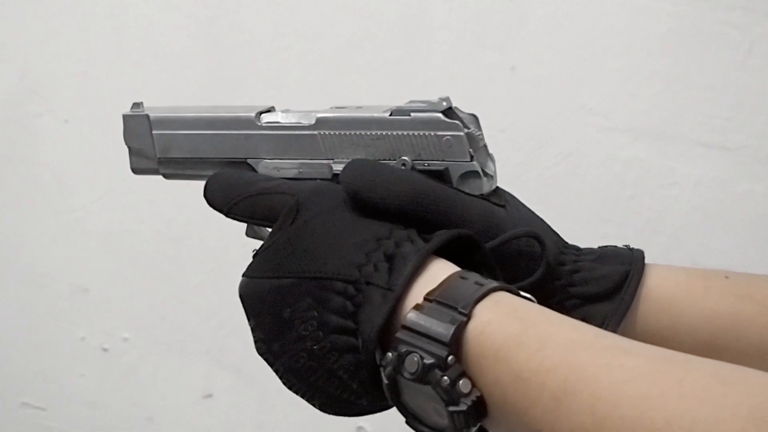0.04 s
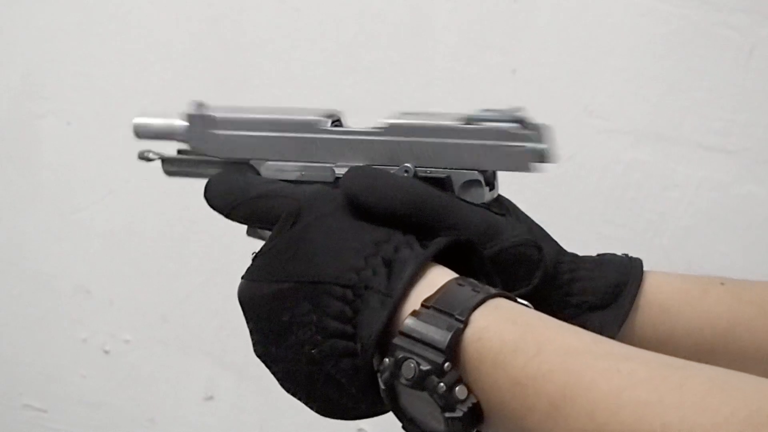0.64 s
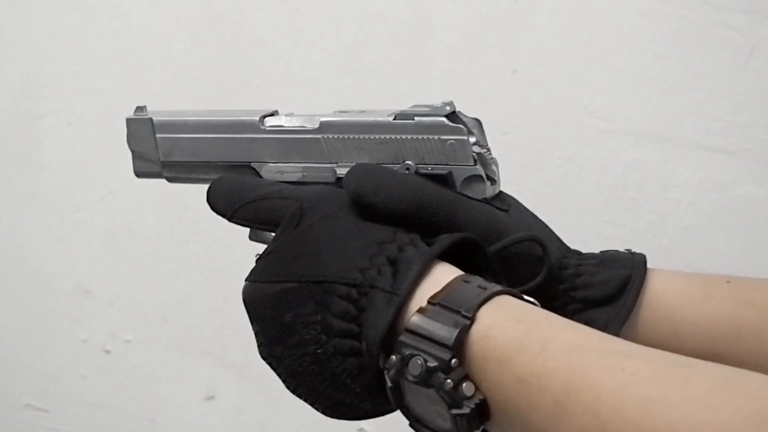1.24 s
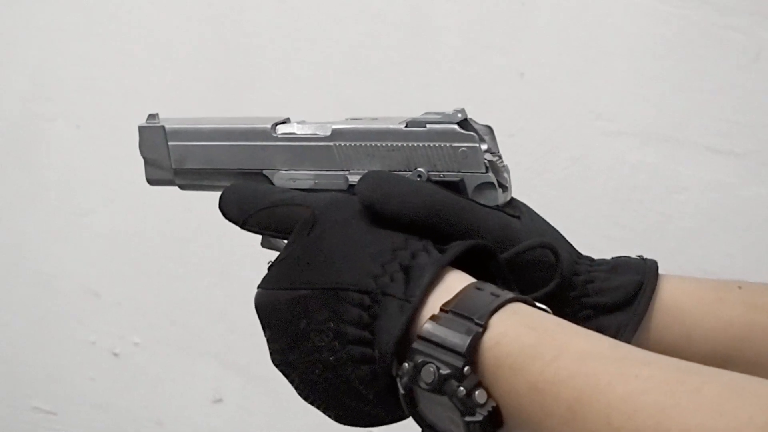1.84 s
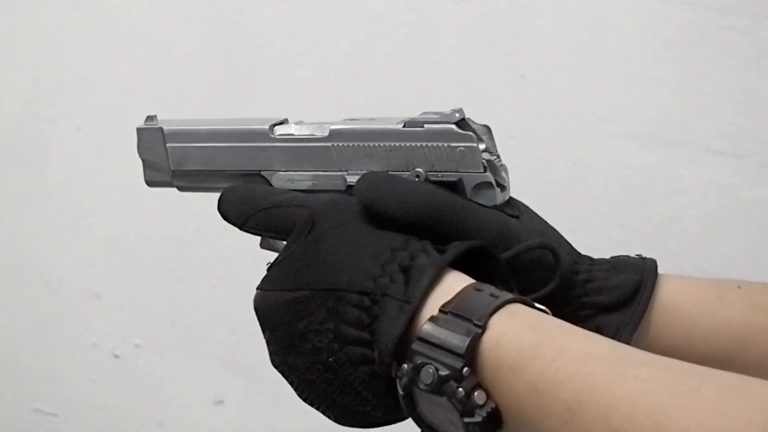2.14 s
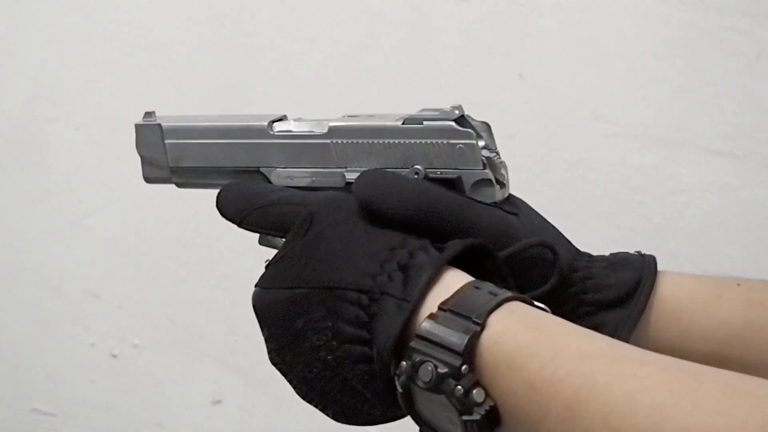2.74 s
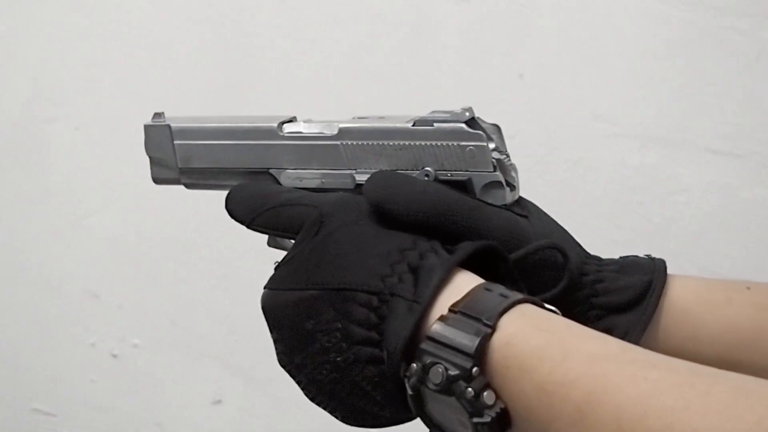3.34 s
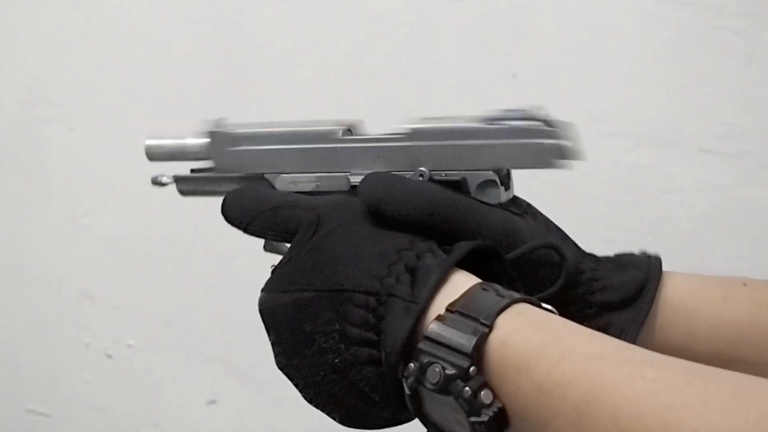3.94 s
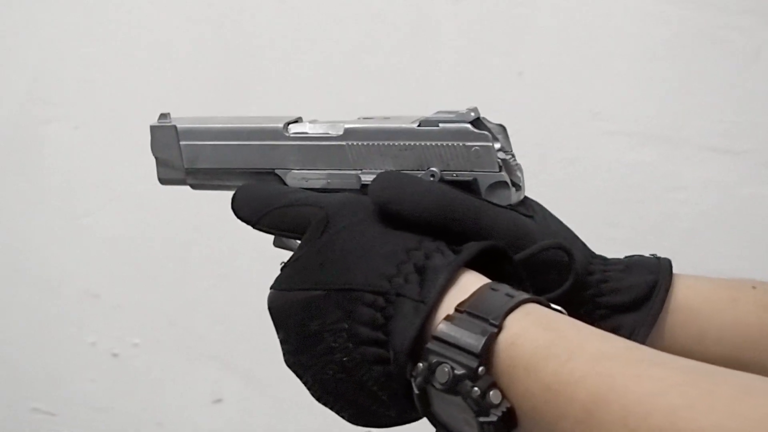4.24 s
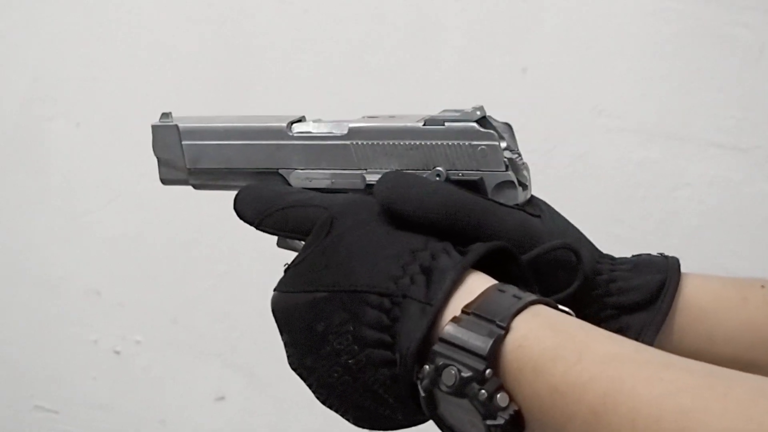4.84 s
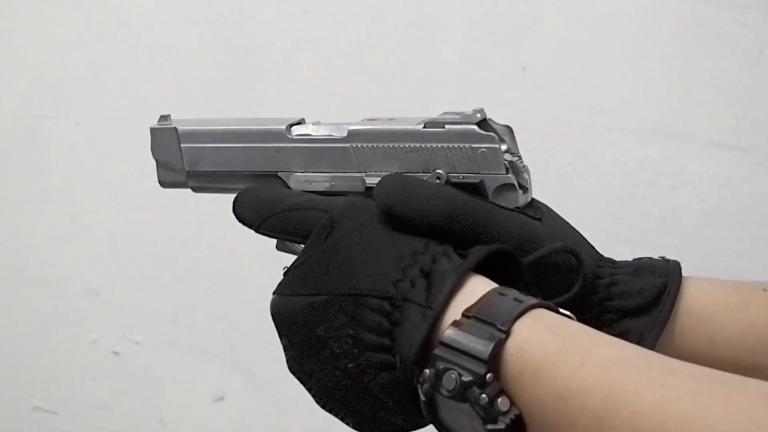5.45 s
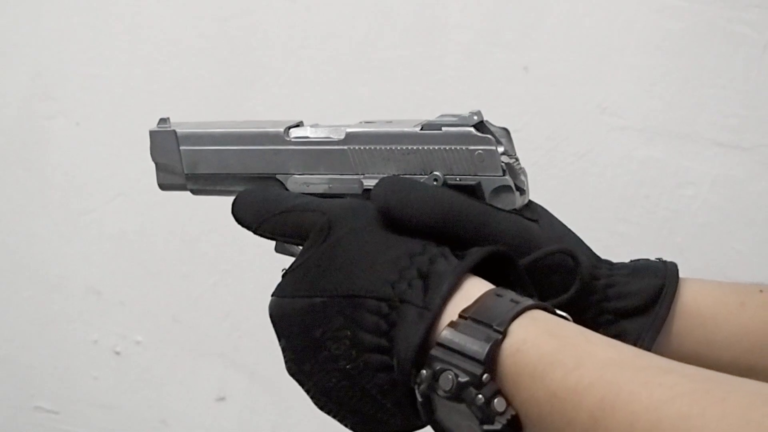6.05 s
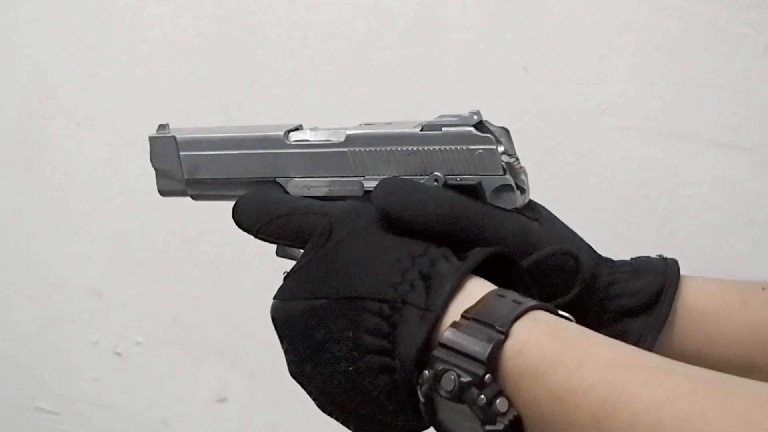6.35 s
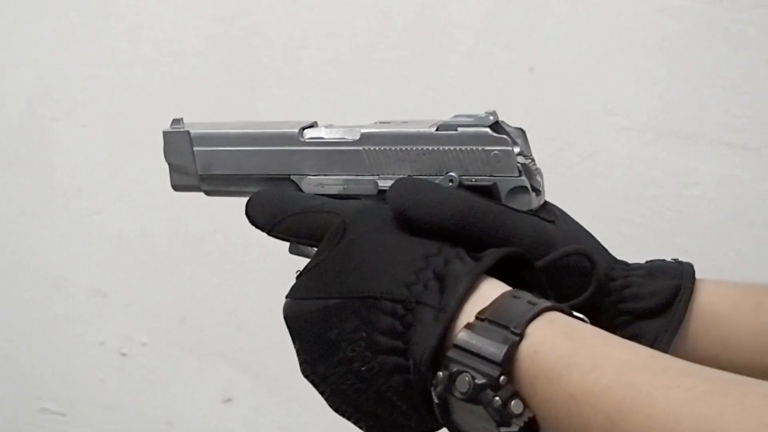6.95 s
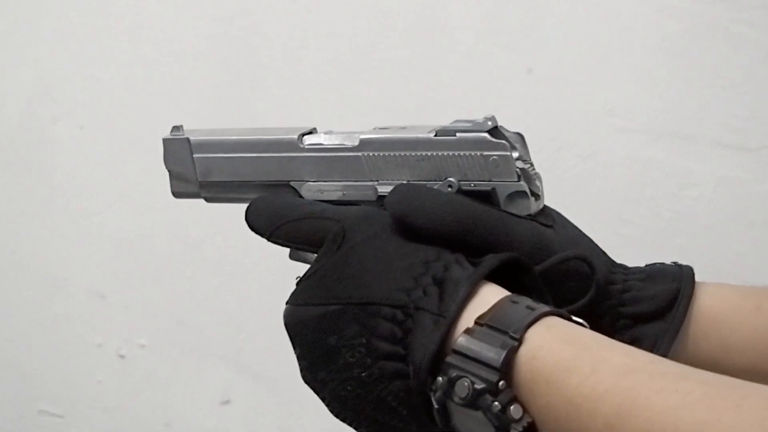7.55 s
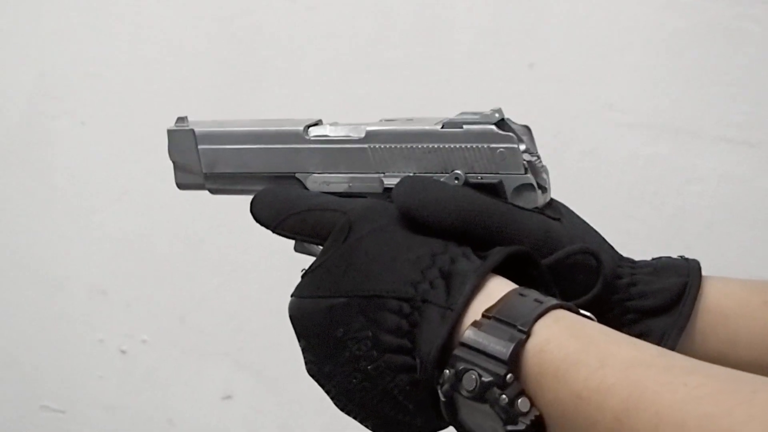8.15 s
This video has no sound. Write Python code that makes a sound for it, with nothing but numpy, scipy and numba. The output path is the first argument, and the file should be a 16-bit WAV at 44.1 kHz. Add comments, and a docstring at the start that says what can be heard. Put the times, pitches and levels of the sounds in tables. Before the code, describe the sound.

An airsoft pistol fires nine sharp shots with a clattering slide in a hard, echoing hall, over a faint ventilation hum.

```python
"""Airsoft pistol in an indoor range

A gas blowback pistol fires nine close shots in a hard, echoing hall: each is a hammer click, a gas
blast and the clatter of the slide, then the pellet's knock on the backstop. Strays ricochet and tick
on the floor far away. Gain control ducks each blast and lifts the long tail, over faint air and hum."""
import sys
import numpy as np
from scipy import signal
from scipy.fft import rfft, irfft, next_fast_len
from scipy.io import wavfile
from scipy.ndimage import uniform_filter1d
from numba import njit

SR = 44100
rng = np.random.default_rng(int(sys.argv[2]) if len(sys.argv) > 2 else 0)


def pcm_store(signal):
    """Save signal as 16-bit PCM."""
    levels = np.round(np.clip(np.atleast_2d(signal), -1, 1) * 32767)
    wavfile.write(sys.argv[1], SR, levels.astype(np.int16).T)


N = 361179

# the shots: (time [s], gas blast [dB], hammer [dB], slide [dB], backstop knock [dB])
SHOTS = [(0.6355, 21, -7, 6.5, 0), (2.0310, 25.5, -14.5, 1, 1), (2.5956, 22.5, -15, 9.5, -21),
         (3.9625, 22, -12, 6, -10), (4.506, 26.5, -8.5, 12.5, -9), (5.8770, 20.5, -13, 1, -3),
         (6.2905, 18, -10, 11.5, -10), (7.3490, 24, -11, 9.5, 4), (7.7600, 22, -14, 9.5, -24)]
# modes of grip, slide and barrel: (frequency [Hz], width [Hz], level [dB])
STEEL_MODES = [(473, 190, 8.5), (975, 110, 18.5), (1590, 250, 9.5), (2310, 210, 18.5), (3270, 1300, 12),
               (3900, 780, 12.5), (8100, 1150, 8), (10200, 780, -27)]
# tone of the microphone: (frequency [Hz], gain [dB])
MIC_EQ = [(40, -24), (120, -5.5), (600, -5.5), (1020, -3), (1330, -8), (1750, -2), (2120, -4.5),
          (3400, -0.5), (6600, -5), (8300, -4), (9800, -2.5), (11600, -7.5), (13000, -19.5), (16000, -22.5)]


def pistol(hammer_lead_s=0.0092, hiss_db=-13.5, hall_db=-12, boom_db=10, ring_db=8.5):
    """Hammer, blast and slide, in mid and side; the muzzle shifts, so each shot has its own echoes."""
    # the slide unlocks, hits its stop and springs home: (delay after the blast [s], level [dB])
    slide_hits = [(0.0075, -1.5), (0.018, 3), (0.069, -3)]
    # ring that the whole pistol sends into the hall: (frequency [Hz], width [Hz], level [dB])
    frame_modes = [(496, 41, 2), (1000, 29, 0.5), (1690, 195, 2), (2660, 160, -3.5), (3434, 55, -2),
                   (4290, 300, -3.5), (4625, 94, 5), (8230, 330, 5), (9590, 360, 3.5)]
    out = np.zeros((2, N))
    for s, blast_db, hammer_db, slide_db, _ in SHOTS:
        add(out, s - hammer_lead_s, undb(hammer_db) * hammer())
        add(out, s, undb(blast_db) * (gas_blast() + undb(hiss_db) * breech_hiss()))
        for delay, db in slide_hits:
            add(out, s + delay, undb(slide_db + db) * slide_clack())
        echoes = hall()
        add(out, s, undb(blast_db + hall_db) * echoes + undb(boom_db) * hall_boom())
        # mid and side swap: the metal's ring arrives by other paths than the blast
        add(out, s, undb(ring_db) * ring(echoes[::-1], frame_modes))
    return out


def gas_blast(hold_s=0.0022, t60=0.013, push_s=0.00035, push_db=1):
    """Gas leaves the muzzle: one push of air under a short turbulent crack."""
    # resonances of the blast: (frequency [Hz], width [Hz], level [dB])
    blast_modes = [(422, 210, 4.5), (1010, 130, 6), (1360, 1100, -3), (2550, 130, 6), (2980, 310, 2.5),
                   (4500, 920, -5.5), (8070, 240, 1.5), (11400, 1900, -10)]
    t = np.arange(SR // 10) / SR
    flow = fade(np.maximum(t - hold_s, 0), t60)
    crack = ring(rng.standard_normal((2, len(t))) * flow, blast_modes)
    push = undb(push_db) * (1 - 0.37 * t / push_s) * np.exp(-t / push_s)
    crack[0] -= push  # mid only
    return crack


def breech_hiss(open_s=0.025, low_hz=5200):
    """Gas hisses out of the breech while the slide runs back, until the valve shuts."""
    t = np.arange(SR // 10) / SR
    flow = np.minimum(t / open_s, 1) ** 0.96 * fade(np.maximum(t - open_s, 0), t60=0.0052)
    highpass = signal.butter(2, low_hz, "high", fs=SR, output="sos")
    return signal.sosfilt(highpass, rng.standard_normal((2, len(t))) * flow)


def slide_clack(modes_db=-2, crack_db=1):
    """Metal meets metal: a dry crack and the short ring of grip, slide and barrel."""
    contact = burst(t60=0.023)
    return undb(modes_db) * ring(contact, STEEL_MODES) + undb(crack_db) * contact


def hammer(modes_db=-6, noise_db=-2.5):
    """The hammer falls: a steely click with a short wash of noise."""
    return undb(modes_db) * ring(burst(t60=0.011), STEEL_MODES) + undb(noise_db) * burst(t60=0.57)


def pellets(flight_s=0.18, contact_t60=0.07, tick_top_hz=15300):
    """Plastic pellets knock on the backstop, ricochet and tick; returns direct sound and hall send."""
    # ricochets off panels and fittings: (time [s], level [dB], centre [Hz], width [octaves])
    ricochets = [(4.159, 6.5, 11000, 0.57), (4.547, 2, 3750, 0.8), (4.869, 1.5, 2550, 1.28),
                 (6.261, -4, 3300, 0.39)]
    # ticks on the hard floor: (time [s], level [dB], low edge [Hz])
    floor_ticks = [(1.732, -34, 6750), (3.142, -20.5, 8380), (3.336, -25, 5150), (3.620, -36, 3860),
                   (3.731, -34, 3900), (5.074, -15.5, 6370), (5.385, -17.5, 2960), (5.420, -11, 1900),
                   (6.814, -18, 5250), (7.060, -36.5, 5030)]
    knock_db, ricochet_db, tick_db = -10, 8, -17  # direct sound against the hall send
    hits = [(s + flight_s, db, knock_db, band(hz=2020, octaves=3.65)) for s, *_, db in SHOTS]
    hits += [(s, db, ricochet_db, band(hz, octaves)) for s, db, hz, octaves in ricochets]
    hits += [(s, db, tick_db, (low_hz, tick_top_hz)) for s, db, low_hz in floor_ticks]
    direct, send = np.zeros((2, N)), np.zeros(N)
    for s, db, direct_db, edges_hz in hits:
        bandpass = signal.butter(2, edges_hz, "band", fs=SR, output="sos")
        add(direct, s, undb(db + direct_db) * signal.sosfilt(bandpass, burst(contact_t60)))
        add(send, s, undb(db) * signal.sosfilt(bandpass, signal.unit_impulse(SR // 10)))
    return direct, send


def trigger(send_db=-9):
    """The trigger takes up its slack with small ringing clicks; returns direct sound and hall send."""
    # audible pulls: (time [s], level [dB])
    pulls = [(3.854, -29), (7.263, -32.5)]
    # clicks within one pull: (delay [s], level [dB])
    clicks = [(0, 3), (0.010, -10.5), (0.043, -25)]
    # modes of the linkage: (frequency [Hz], width [Hz], level [dB])
    linkage_modes = [(1640, 170, 11), (1900, 180, 11.5), (3380, 3300, 0), (9600, 720, 0)]
    direct, send = np.zeros((2, N)), np.zeros(N)
    for s, pull_db in pulls:
        for delay, db in clicks:
            add(direct, s + delay, undb(pull_db + db) * burst(t60=0.089))
            add(send, s + delay, undb([pull_db + db + send_db]))
    return ring(direct, linkage_modes), ring(send, linkage_modes)


def grip_tick(time_s=1.886, level_db=-31):
    """One faint, dull tick as the gloved hand tightens on the grip."""
    # modes of the grip: (frequency [Hz], width [Hz], level [dB])
    grip_modes = [(600, 250, 14), (2200, 600, 2)]
    out = np.zeros((2, N))
    add(out, time_s, undb(level_db) * ring(burst(t60=0.02), grip_modes))
    return out


def hall(late_share=0.21, build_s=0.67):
    """Mid and side response of the hall from one spot: dense echoes that lose their treble first."""
    # reverb time: (frequency [Hz], t60 [s])
    decay_times = [(150, 1.74), (400, 1.554), (1000, 1.467), (2000, 1.305), (4000, 1.124), (7000, 0.88),
                   (10500, 0.66), (16000, 0.46)]
    # tone of the reverb: (frequency [Hz], gain [dB])
    hall_eq = [(60, -15), (90, -8.5), (125, -1.5), (250, -1), (400, 1.5), (700, 1), (1500, -1), (4000, 1),
               (8000, 1), (15000, -2)]
    t = np.arange(2 * SR) / SR
    hz = np.fft.rfftfreq(len(t), 1 / SR)
    spectrum = rfft(rng.standard_normal((2, len(t)))) * undb(curve_at(hall_eq, hz))
    centres = np.transpose(decay_times)[0]
    echoes = np.zeros((2, len(t)))
    for centre, t60 in decay_times:
        band_weight = curve_at(np.c_[centres, centres == centre], hz)
        echoes += irfft(spectrum * band_weight) * fade(t, t60)
    # the echoes thicken as the sound comes back from the far walls
    return echoes * (1 - late_share * fade(t, build_s))


def hall_boom(t60=2.3, partner_db=-7, trim_db=-38):
    """A shot stirs standing waves in close pairs that beat and outlast the echoes."""
    # standing waves: (frequency [Hz], width [Hz], level [dB])
    room_modes = [(117.1, 4, 12.5), (140, 3.3, 0), (172.95, 5.2, 14), (343.5, 5.4, 2.5)]
    t = np.arange(2 * SR) / SR
    out = np.zeros((2, len(t)))
    for hz, width, db in room_modes:
        partner_hz = hz + width * rng.uniform(-1.566, 1.527)
        main, partner = np.sin(2 * np.pi * (np.outer([hz, partner_hz], t) + rng.random((2, 1))))
        swell = 1 - np.exp(-np.pi * width * t)
        out[0] += undb(db + trim_db) * (main + undb(partner_db) * partner) * swell
    return out * fade(t, t60)


def ventilation(air_db=-46.5, spread_db=-5):
    """Steady moving air, partly unrelated left and right, and a faint motor hum."""
    # spectrum of the air: (frequency [Hz], relative level [dB])
    air_eq = [(25, -35), (45, 14.5), (70, 4.5), (150, -1.5), (300, -6), (800, -13.5), (1750, -22),
              (3400, -28.5), (5300, -32), (10000, -36), (16000, -52)]
    # motor tones: (frequency [Hz], rms level [dB])
    hum_tones = [(70, -69), (140, -64), (280, -70)]
    t = np.arange(N) / SR
    noise = rng.standard_normal(N) + undb(spread_db) * rng.standard_normal((2, N))
    air = equalise(equalise(noise, air_eq), MIC_EQ)
    hum = sum(undb(db) * np.sqrt(2) * np.sin(2 * np.pi * (hz * t + rng.random())) for hz, db in hum_tones)
    return undb(air_db) * air / air.std() + hum


def microphone(mid_side):
    """Mid and side to stereo: two close ports share the bass, and the left is the brighter."""
    # stereo width: (frequency [Hz], side against mid [dB])
    width_eq = [(200, -31), (1000, -21), (2000, -18.5), (4000, -8.5), (8000, -2.5), (12000, 0)]
    # treble tilt, partly added on the left and taken off the right: (frequency [Hz], gain [dB])
    tilt_eq = [(1000, 0), (2200, -2), (4000, 3), (6000, 7), (8300, 12), (10500, 16), (14000, 8.5)]
    mid, side = mid_side[0], equalise(mid_side[1], width_eq)
    even_power = [(hz, -10 * np.log10(1 + undb(db) ** 2)) for hz, db in width_eq]
    ports = equalise(np.array([mid + side, mid - side]), even_power)
    left, right = equalise(ports, MIC_EQ)
    return np.array([equalise(left, tilt_eq, amount=0.33), equalise(right, tilt_eq, amount=-0.17)])


def undb(db):
    """Decibels to gain."""
    return 10 ** (np.asarray(db) / 20)


def curve_at(table, hz):
    """A curve's value, interpolated on a log-frequency axis."""
    points, values = np.transpose(table)
    return np.interp(np.log(np.maximum(hz, 1)), np.log(points), values)


def equalise(x, table, amount=1):
    """Minimum-phase EQ from (frequency [Hz], gain [dB]); amount scales the decibels."""
    size = next_fast_len(x.shape[-1] + SR // 10, True) * 2
    gain = undb(curve_at(table, np.fft.rfftfreq(size, 1 / SR)))
    cepstrum = irfft(amount * np.log(gain))
    # folding onto positive time makes the filter causal
    cepstrum[1:size // 2] *= 2
    cepstrum[size // 2 + 1:] = 0
    return irfft(rfft(x, size) * np.exp(rfft(cepstrum)))[..., :x.shape[-1]]


def ring(x, modes):
    """Parallel resonators of alternating polarity: (frequency [Hz], width [Hz], level [dB])."""
    return sum((-1) ** k * undb(db) * signal.lfilter(*signal.iirpeak(hz, hz / width, SR), x)
               for k, (hz, width, db) in enumerate(modes))


def fade(t, t60):
    """Exponential decay, 60 dB down at t60."""
    return np.exp(-np.log(1000) * t / t60)


def burst(t60):
    """A tenth of a second of fading noise, as mid and side."""
    t = np.arange(SR // 10) / SR
    return rng.standard_normal((2, len(t))) * fade(t, t60)


def band(hz, octaves):
    """Lower and upper edge of a band around a centre."""
    return hz * 2 ** (octaves * np.array([-.5, .5]))


def add(track, s, sound):
    """Mix a sound into a track at s seconds."""
    start = int(s * SR)
    part = sound[..., :N - start]
    track[..., start:start + part.shape[-1]] += part


@njit
def duck(over_db, attack_s, release_db_per_s):
    """Gain reduction in dB: climbs towards the excess level, then sinks at a steady rate."""
    out, cut = np.empty(len(over_db)), 0.
    for i in range(len(over_db)):
        if over_db[i] > cut:
            cut += (over_db[i] - cut) / (1 + attack_s * SR)
        else:
            cut = max(cut - release_db_per_s / SR, 0.)
        out[i] = cut
    return out


def scene():
    """Pistol, pellets and their reverb at the microphone, over a bed of ventilation."""
    clicks, click_send = trigger()
    knocks, knock_send = pellets()
    soft_hall = hall(late_share=0.57, build_s=0.18)  # echoes of small hits swell in softly
    echoes = signal.fftconvolve((click_send + knock_send)[None], soft_hall, axes=1)[:, :N]
    return microphone(pistol() + grip_tick() + clicks + knocks + echoes) + ventilation()


def record(dry, limit_db=-9, target_db=-12, top_hz=16000):
    """The deeper of a fast limiter and a slower gain control ducks; peaks are rounded, the top is cut."""
    power = uniform_filter1d(np.mean(dry ** 2, axis=0), size=128)
    level_db = 10 * np.log10(np.maximum(power, 1e-12))
    fast_cut_db = duck(level_db - limit_db, attack_s=0.0011, release_db_per_s=51.8)
    slow_cut_db = duck(level_db - target_db, attack_s=0.014, release_db_per_s=29.9)
    rounded = np.tanh(dry * undb(-np.maximum(fast_cut_db, slow_cut_db)))
    return signal.sosfilt(signal.ellip(10, .2, 80, top_hz, fs=SR, output="sos"), rounded)


dry = scene()
out = record(dry)
pcm_store(out)
```